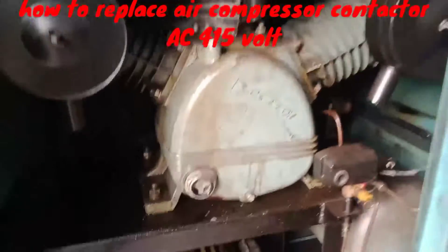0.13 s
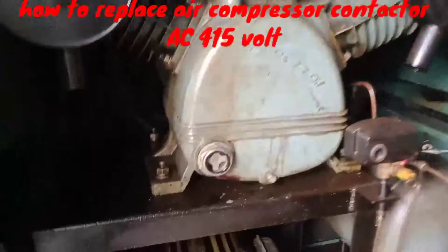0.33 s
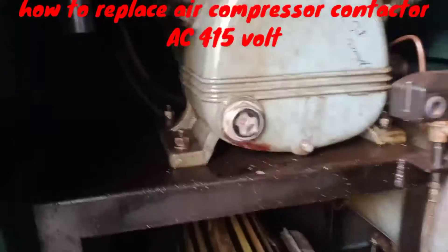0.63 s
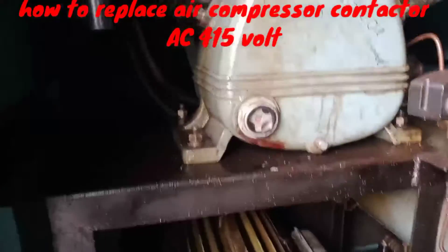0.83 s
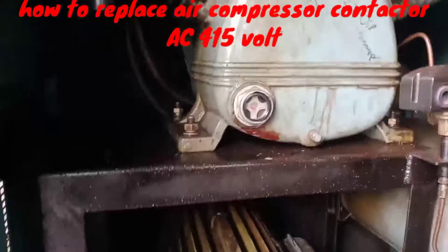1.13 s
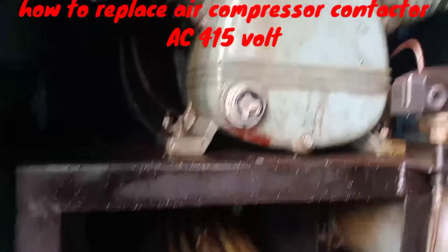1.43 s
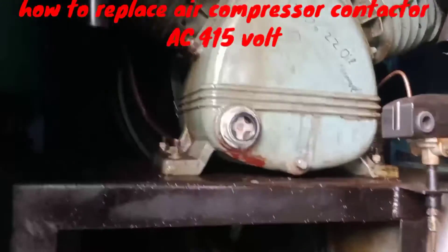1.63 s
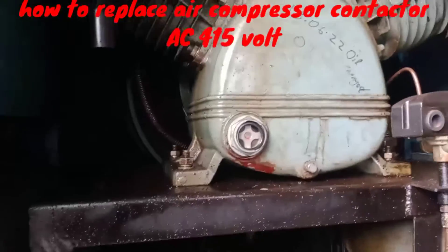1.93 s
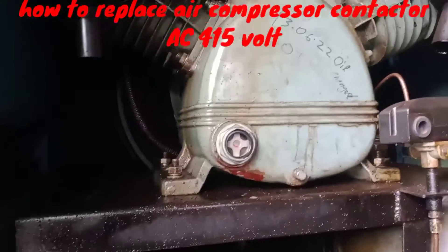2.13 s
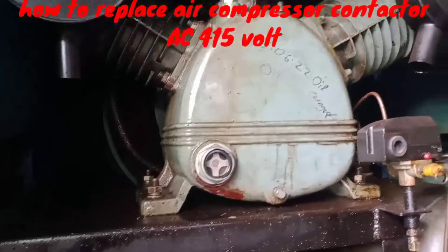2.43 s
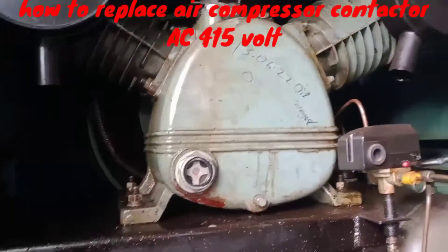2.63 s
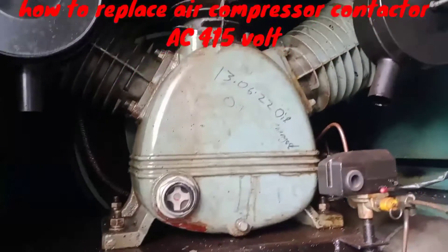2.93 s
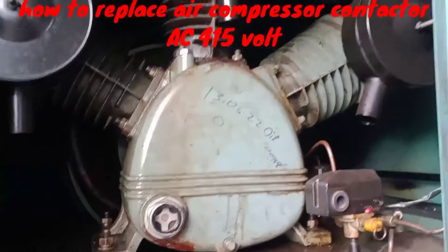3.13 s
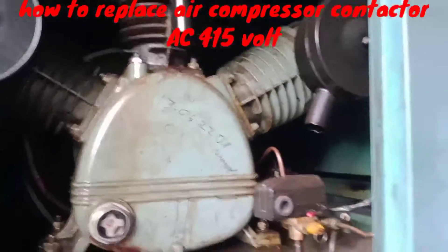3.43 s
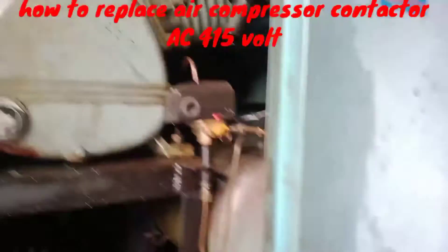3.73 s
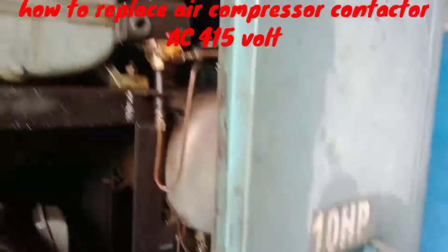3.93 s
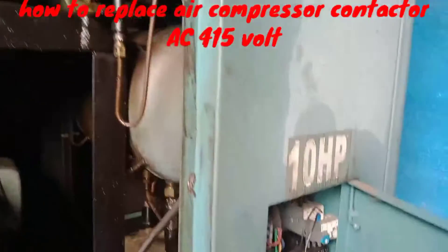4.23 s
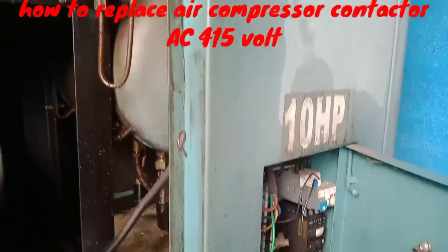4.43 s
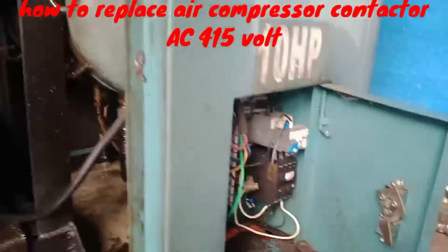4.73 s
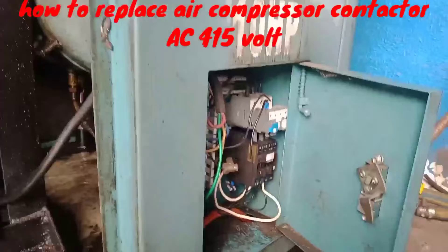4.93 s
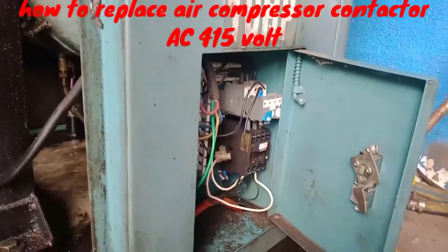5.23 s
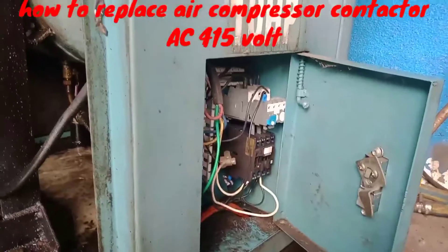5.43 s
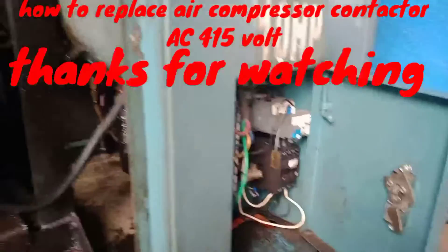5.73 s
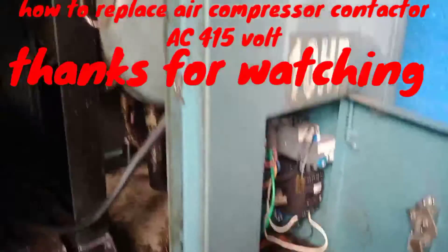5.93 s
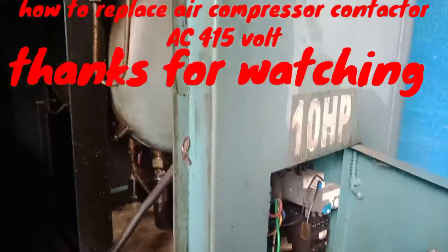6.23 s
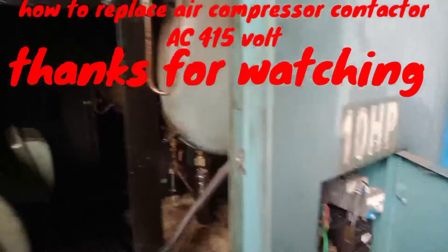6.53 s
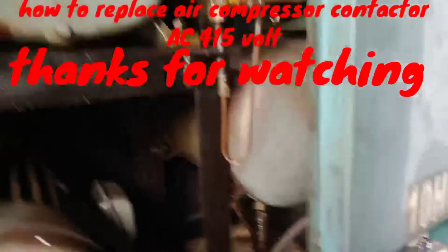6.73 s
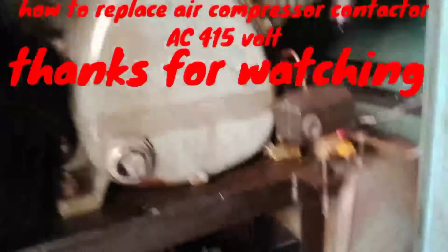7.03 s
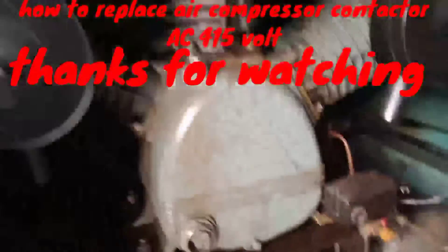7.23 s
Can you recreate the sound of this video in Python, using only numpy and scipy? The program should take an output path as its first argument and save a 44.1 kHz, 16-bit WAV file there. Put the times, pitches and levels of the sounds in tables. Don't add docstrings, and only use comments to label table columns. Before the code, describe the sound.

A motor-driven piston compressor is already running at full speed and continues to the end at about 7.4 seconds, without starting or stopping. Roughly thirteen turns per second make a dense, throbbing chug: deep frame thumps, hollow gulps through intake cans, pipe knocks, rattling fins and quick valve ticks. Smooth fan and belt whir fills in beneath, with short workshop reflections. From 0 to 1.6 seconds the microphone is close and leaking air hisses brightly, darkening around 1 second; the nearest metallic rattle passes near 1.2. At about 1.7 the hiss and clatter drop abruptly. From 3.8 to 4.5 it moves round a metal door, becoming boxier with a light draught; a tiny belt squeak comes near 4.6. Duller hiss and clatter swell around 5.3, then recede by 6.2. From 6.2 to 7.4 the microphone swings back towards the pump, still pounding evenly.

```python
import sys
import numpy as np
from scipy import signal
from scipy.fft import rfft, irfft
from scipy.io import wavfile

SR = 44100
rng = np.random.default_rng(int(sys.argv[2]) if len(sys.argv) > 2 else 0)


def persist_wave(psi):
    counts = np.round(np.clip(psi, -1, 1) * 32767).astype(np.int16)
    wavfile.write(sys.argv[1], SR, np.atleast_2d(counts).T)


def decibels_to_gain(level_db):
    exponent = np.asarray(level_db, float) / 20
    return 10 ** exponent


N = 325045
RUN_IN = 30000
TURNS_PER_S = 12.987

# t/s, place (0 by the heads, 1 below the shelf, 2 behind the door)
MIC_PATH = [
    (0, .3),
    (.4, 0),
    (.8, .4),
    (1.9, 1),
    (3.75, 1.05),
    (4.4, 1.88),
    (4.8, 1.97),
    (6.1, 2),
    (6.9, 1.1),
    (7.4, .7),
]
# t/s, openness level/dB, pitch of the leak as heard f/Hz
SIGHT_LINE = [(0, -0.3, 5430), (.9, 1.5, 5700), (1.1, -0.2, 3840), (1.55, -0.2, 3700), (1.7, -13, 3700),
              (2.2, -15.5, 3870), (3.3, -18, 4000), (4.5, -15.5, 3450), (5.05, -10.5, 3000),
              (5.3, -5.5, 2940), (5.7, -8, 2900), (6.2, -13, 2950), (6.8, -12, 3040), (6.95, -14, 3180),
              (7.1, -13, 3230), (7.4, -12, 3440)]
# t after turn start/ms, tick level/dB, clatter level/dB,
# t60/s, tick colour f/Hz
VALVE_LANDINGS = [
    (17.75, 1, 2, 0.026, 6300),
    (21.0, -7.5, -8, 0.04, 6500),
    (30.2, -4.5, -9, 0.039, 9250),
    (39.7, -15, 2, 0.071, 7000),
    (43.5, 0, -1, 0.028, 6900),
    (50.7, -13.5, -14.5, 0.1, 7500),
    (74.2, -19.5, -12.5, 0.036, 7800),
]


def rms_one(x):
    return x / np.sqrt(np.mean(x ** 2) + 1e-20)


def in_time(rows):
    s, *columns = np.transpose(rows)
    return [np.interp(np.arange(N) / SR, s, c) for c in columns]


def mic_place():
    return in_time(MIC_PATH)[0]


def by_place():
    # place, thump level/dB, can level/dB, pipe level/dB, door shadow (0-1), door panel level/dB
    spots = [
        (0, 0.9, .8, -30, 0.07, -46),
        (.6, -0.5, 0.6, -34.5, 0.43, -46.5),
        (1, 0.5, 1, -32, 0.06, -46),
        (1.3, 1, 1.2, -32, 0.17, -38.5),
        (2, 0.64, 2.1, -36.5, 0.79, -40.5),
    ]
    place, *columns = np.transpose(spots)
    return [np.interp(mic_place(), place, c) for c in columns]


def each_turn(ms, level_db, scatter_db, jitter_ms):
    start = np.arange(-8, 97)[:, None] / TURNS_PER_S
    sway_ms, period_s, earliest_s, mean_lag_ms = .65, 8.0, 2.6, .46
    lag = mean_lag_ms - sway_ms * np.cos(2 * np.pi * (start - earliest_s) / period_s)
    time_luck, level_luck = rng.standard_normal((2, len(start), len(ms)))
    at_s = start + (ms + lag + jitter_ms * time_luck) / 1000
    at = np.round(at_s * SR).astype(int) + RUN_IN
    clicks = np.full(N + 3 * RUN_IN, 1e-18)
    np.add.at(clicks, at, decibels_to_gain(level_db + scatter_db * level_luck))
    return clicks[:N + RUN_IN]


def ring(clicks, hz, t60):
    r, w = decibels_to_gain(-60 / (t60 * SR)), 2 * np.pi * hz / SR
    return signal.lfilter([0, np.sin(w)], [1, -2 * r * np.cos(w), r * r], clicks)


def resonances(x, peaks):
    out = 0
    for k, (hz, width, level_db) in enumerate(peaks):
        r = np.exp(-np.pi * width / SR)
        top = (1 - r * r) / 2 * decibels_to_gain(level_db) * (-1) ** k
        out = out + signal.lfilter([top, 0, -top], [1, -2 * r * np.cos(2 * np.pi * hz / SR), r * r], x)
    return out


def narrow_noise(hz, width_hz):
    peak = [(hz, width_hz, 0)]
    return rms_one(resonances(resonances(rng.standard_normal(N), peak), peak))


def hall(x, t60):
    t = np.arange(int(.4 * SR)) / SR
    tail = rng.standard_normal(len(t)) * decibels_to_gain(-60 * t / t60) * (t > .003)
    return signal.fftconvolve(x, tail / np.sqrt(np.sum(tail ** 2)))[:N]


def gulped(modes, ms, gulp_db, scatter_db):
    gulps = -each_turn(ms, gulp_db, scatter_db, .02)
    out = sum(ring(gulps, hz, t60) * np.array(push)[:, None] / 100 for hz, *push, t60 in modes)
    out = signal.sosfilt(signal.butter(4, 62, "high", fs=SR, output="sos"), out)[:, RUN_IN:]
    place = mic_place()
    return sum(np.clip(1 - abs(place - k), 0, 1) * heard for k, heard in enumerate(out))


def intake():
    # t after turn start/ms, thump level/dB, can level/dB
    gulp_table = [
        (4.37, -5.5, -25.0),
        (13.23, -13.6, -17.6),
        (32.56, 4.0, -8.4),
        (36.92, -3.1, 3.7),
        (43.61, 1.6, 4.0),
        (55.03, 2.5, -7.3),
        (60.17, -2.6, 0.6),
        (71.29, -25.0, -3.0),
    ]
    # f/Hz, push/% by the heads, below the shelf, behind the door, t60/s
    frame_modes = [(80.9, 4.0, 4.2, -0.8, 0.61), (84.1, -0.5, 1.8, 10.6, 0.521),
                   (121.4, 6.7, 10.4, 15.3, 0.167), (146.3, 10.2, 9.7, 0.7, 0.61),
                   (151.5, -22.6, -27.9, -6.2, 0.141), (160.7, 4.5, 6.0, -10.1, 0.078),
                   (202.7, 0.4, 0.7, 2.3, 0.61)]
    # f/Hz, three pushes/%, t60/s
    can_modes = [(235.1, 3.7, 3.4, 1.2, 0.61), (299.6, 3.0, 3.5, -2.5, 0.071),
                 (327.5, 0.3, 3.2, 6.4, 0.069), (335.1, 4.1, 0.8, -0.9, 0.61),
                 (389.6, -7.3, -7.7, -3.4, 0.157), (429.5, 2.7, 3.2, 2.7, 0.055),
                 (437.2, -0.0, -0.2, -0.9, 0.44), (496.3, -1.0, -1.7, -0.6, 0.206),
                 (558.3, -0.0, 0.2, 0.1, 0.61), (587.0, 1.0, 0.9, 0.8, 0.28)]
    thump_db, can_db, *_ = by_place()
    ms, thump, can = np.transpose(gulp_table)
    low = decibels_to_gain(thump_db) * gulped(frame_modes, ms, thump, scatter_db=.4)
    mid = decibels_to_gain(can_db) * gulped(can_modes, ms, can, scatter_db=.6)
    return low + mid


def struck(modes, ms, knock_db, behind):
    out, sway_at = 0, np.linspace(0, N, num=16)
    for hz, front_db, back_db, t60 in modes:
        favour_db = 4.5 * rng.standard_normal(len(ms))
        late_ms = 2.5 * rng.random(len(ms))
        tone = ring(each_turn(ms + late_ms, knock_db + favour_db, 1.8, .055), hz, t60)[RUN_IN:]
        sway_db = np.interp(np.arange(N), sway_at, 2.5 * rng.standard_normal(len(sway_at)))
        out = out + rms_one(tone) * decibels_to_gain(front_db + behind * (back_db - front_db) + sway_db)
    cushion = signal.butter(2, 2300, "low", fs=SR, output="sos")
    return rms_one(signal.sosfilt(cushion, out))


def knocks():
    # t after turn start/ms, pipe level/dB, fin level/dB
    knock_table = [
        (4.12, 1.5, -10.5),
        (13.98, -0.5, -44),
        (28.7, -4, -49),
        (38.5, -0.5, 0.5),
        (45.3, -1, -6.5),
        (52.82, -4, -2),
        (59.68, 1.5, -12),
        (65.31, 8.5, -11.5),
    ]
    # f/Hz, level in front/dB, level behind the door/dB, t60/s
    pipe_modes = [(260, -6, -2, 0.3), (456, -10, -12, 0.2), (491, -18.5, -16, 0.13), (544, -14, 1.5, 0.044),
                  (596, -5.5, 3, 0.079), (630, -10, 4, .08), (803, -2.5, 1, 0.12), (849, -1.5, -3, 0.1)]
    # f/Hz, level in front/dB, level behind the door/dB, t60/s
    fin_modes = [(875, -8, -1, 0.056), (966, -9, -23, 0.03), (1136, -7.5, -6.5, 0.064),
                 (1279, -4, -28, 0.033), (1399, -5.5, -4.5, 0.019), (1515, -7, -9, 0.062),
                 (1734, -14.5, 2, 0.02), (1906, -7.5, -7, 0.047), (2026, -15.5, -3.5, 0.071)]
    # t/s, distance/m
    barrel_distance = [
        (0, 0.87),
        (.7, 0.84),
        (1.2, 0.52),
        (1.8, 0.77),
        (2.3, 1.23),
        (3.8, 1.9),
        (5.3, 1.17),
        (6.6, 0.98),
        (7, 1.43),
        (7.4, .9),
    ]
    _, _, pipe_db, shadow, _ = by_place()
    behind = np.clip(shadow, 0, 1)
    rattle_db = -34 - 20 * np.log10(in_time(barrel_distance)[0])
    ms, pipe, fin = np.transpose(knock_table)
    puffs = signal.lfilter([1], [1, -decibels_to_gain(-.035)], each_turn(ms, fin, 2.8, 0.48))[RUN_IN:]
    rush = resonances(puffs * rng.standard_normal(N), [(hz, 12.0 / t60, db) for hz, db, _, t60 in fin_modes])
    rattle = struck(fin_modes, ms, fin, behind) + decibels_to_gain(-3) * rms_one(rush)
    echo = hall(rattle, t60=.09)
    rattle = (1 - 0.32 * behind) * rattle + (0.37 + 0.6 * behind) * echo
    return decibels_to_gain(pipe_db) * struck(pipe_modes, ms, pipe, behind) + decibels_to_gain(rattle_db) * rms_one(rattle)


def burst(ms, level_db, t60, snap):
    clicks = each_turn(np.array([ms]), level_db, 1.5, .3)
    gate = signal.lfilter([1], [1, -decibels_to_gain(-60 / (t60 * SR))], clicks)
    gate = signal.lfilter([.025], [1, -.975], gate)
    return (gate * rng.standard_normal(len(gate)) + snap * clicks)[RUN_IN:]


def valve_ticks():
    # f/Hz, width/Hz, level/dB
    plate_peaks = [(6740, 920, -3.5), (6640, 113, 2.5), (7930, 630, -2.5), (8600, 200, 3), (8790, 800, -4),
                   (11700, 1900, -9), (14900, 3100, -8.5)]
    door_shadow_db = [.5, 1.5, 3.5, -5, -5, -4, 0]
    open_db, leak_hz = in_time(SIGHT_LINE)
    facing_db = 6.5 * np.maximum(np.log2(leak_hz / 4000), 0)
    tick_db = -37.5 + 0.66 * open_db + facing_db
    behind = np.maximum.accumulate(np.clip(mic_place() - 1, 0, 1))
    ticks = 0
    for (ms, tick, _, t60, colour_hz), shadow_db in zip(VALVE_LANDINGS, door_shadow_db):
        coloured = [(hz, width, db - np.minimum(24.0 * np.log2(hz / colour_hz) ** 2, 6.0))
                    for hz, width, db in plate_peaks]
        ticks = ticks + resonances(burst(ms, tick, t60, snap=.8), coloured) * decibels_to_gain(shadow_db * behind)
    return decibels_to_gain(tick_db) * rms_one(ticks)


def valve_clatter():
    # f/Hz, width/Hz, level/dB
    casing_peaks = [(2340, 560, 6.5), (3700, 350, 13), (3910, 1380, 8.5), (5600, 240, -8)]
    clatter_db = -37 + in_time(SIGHT_LINE)[0]
    clatters = sum(burst(ms, clatter, 3.65 * t60, snap=3.2) for ms, _, clatter, t60, _ in VALVE_LANDINGS)
    return decibels_to_gain(clatter_db) * rms_one(resonances(clatters, casing_peaks))


def leak_hiss():
    open_db, leak_hz = in_time(SIGHT_LINE)
    hidden_db = np.minimum(open_db + 12, 0)
    hiss_db = -32.5 + open_db + 1.5 * hidden_db
    hiss = 0
    for hz in np.geomspace(2000, 8000, num=9):
        slope = np.where(hz > leak_hz, 70.0, 18.0)
        hiss = hiss + narrow_noise(hz, .25 * hz) * decibels_to_gain(-slope * np.log2(hz / leak_hz) ** 2)
    puffs = each_turn(np.array([17.5, 42.0]), np.array([-5.5, -.5]), 3.3, 0.87)
    pant = rms_one(0.47 + signal.lfilter([1], [1, -decibels_to_gain(-.012)], puffs)[RUN_IN:])
    return decibels_to_gain(hiss_db - 7) * hiss * pant


def whir():
    # f/Hz, level per Hz/dB
    whir_colour = [(12, -50), (28, -36), (60, -6.5), (200, -2.5), (800, -14.5), (2200, -25), (5000, -47.5),
                   (16000, -48.5)]
    colour_hz, colour_db = np.transpose(whir_colour)
    hz = np.maximum(np.fft.rfftfreq(N, 1 / SR), 1)
    colour = decibels_to_gain(np.interp(np.log(hz), np.log(colour_hz), colour_db))
    return decibels_to_gain(-31) * rms_one(irfft(rfft(rng.standard_normal(N)) * colour, N))


def door_panel():
    knock = each_turn(np.array([64.0]), 0, 2.0, .03)
    return decibels_to_gain(by_place()[-1]) * rms_one(ring(knock, hz=961, t60=.14)[RUN_IN:])


def draught():
    behind = np.clip(mic_place() - 1, 0, 1)
    return decibels_to_gain(-50) * behind * narrow_noise(hz=2510, width_hz=510)


def belt_squeak():
    start_s, length_s, edge_s = 4.55, .17, .03
    t = np.arange(N) / SR - start_s
    shape = np.clip(np.minimum(t, length_s - t) / edge_s, 0, 1)
    return decibels_to_gain(-50) * shape * narrow_noise(hz=2550, width_hz=70)


def scene():
    heads = valve_ticks() + valve_clatter() + leak_hiss()
    echo = decibels_to_gain(-11.5) * hall(heads, t60=.25)
    mix = intake() + knocks() + heads + echo + whir() + door_panel() + draught() + belt_squeak()
    return mix[None]


def low_pass(x):
    return signal.sosfilt(signal.butter(12, 16780, fs=SR, output="sos"), x)


def record(dry):
    x = signal.sosfilt(signal.butter(1, 12, "high", fs=SR, output="sos"), dry)
    x = signal.sosfilt(signal.cheby2(14, 40, 15850, fs=SR, output="sos"), x)
    return low_pass(x)


dry = scene()
out = record(dry)
persist_wave(out)
```